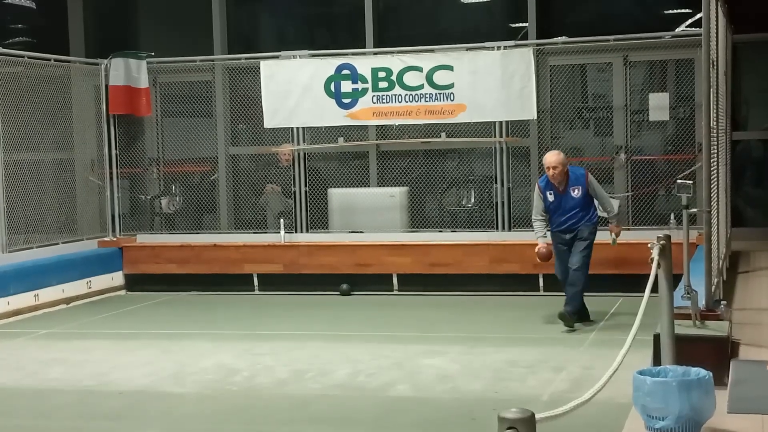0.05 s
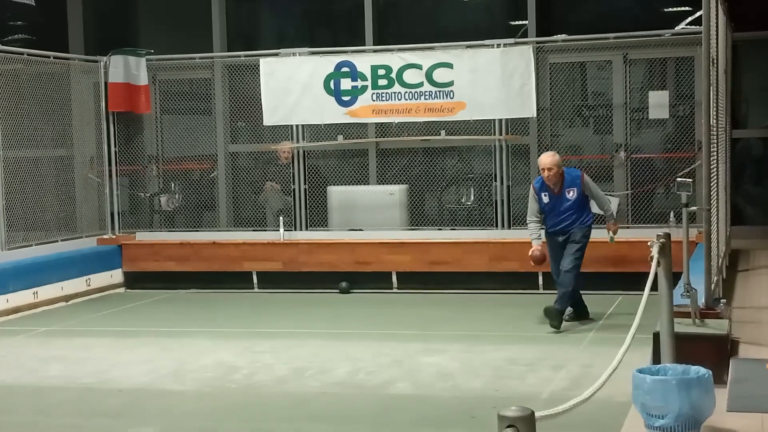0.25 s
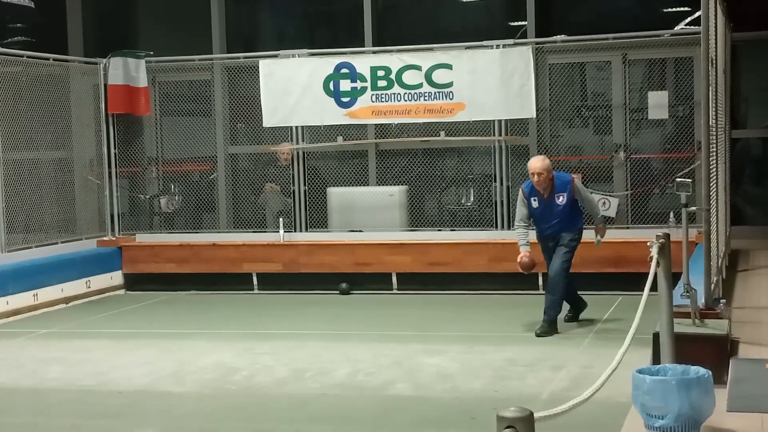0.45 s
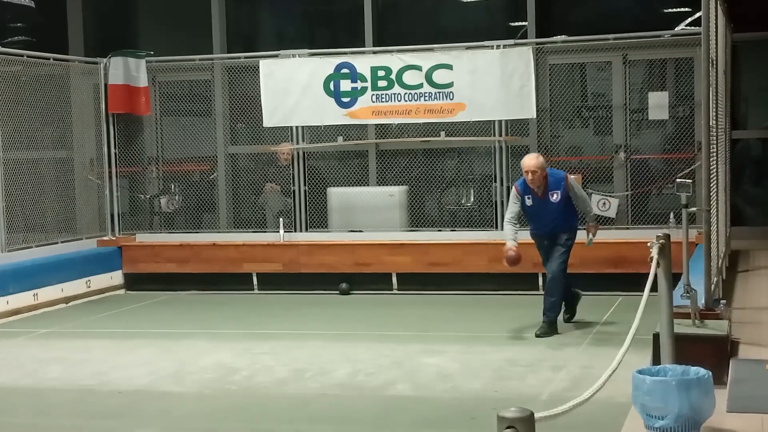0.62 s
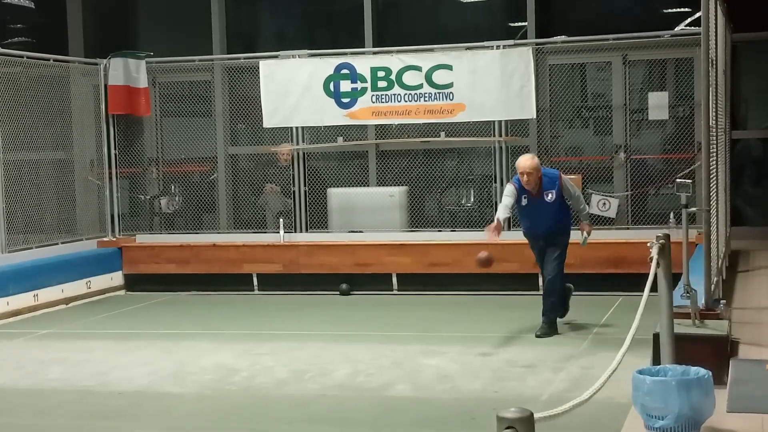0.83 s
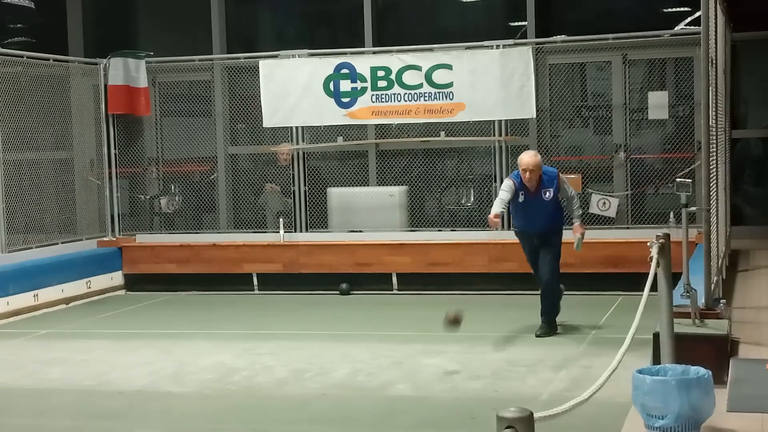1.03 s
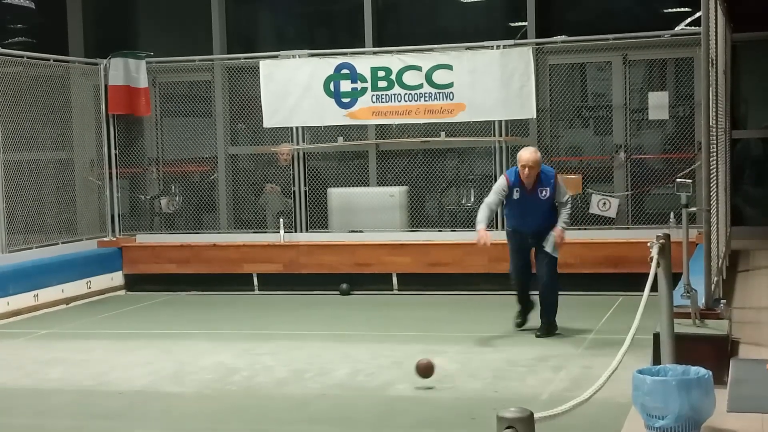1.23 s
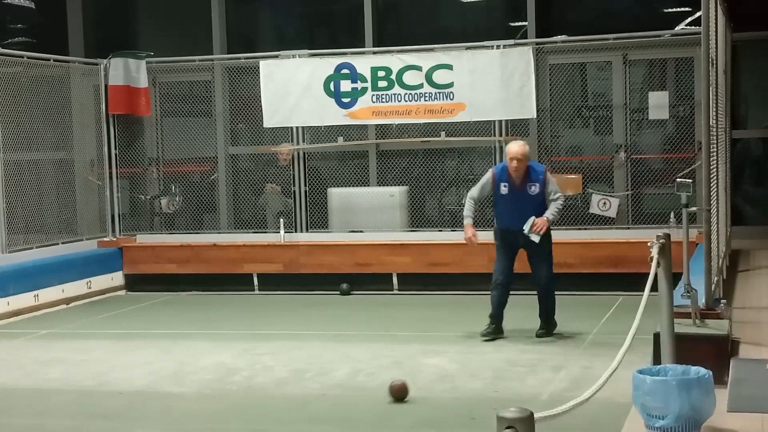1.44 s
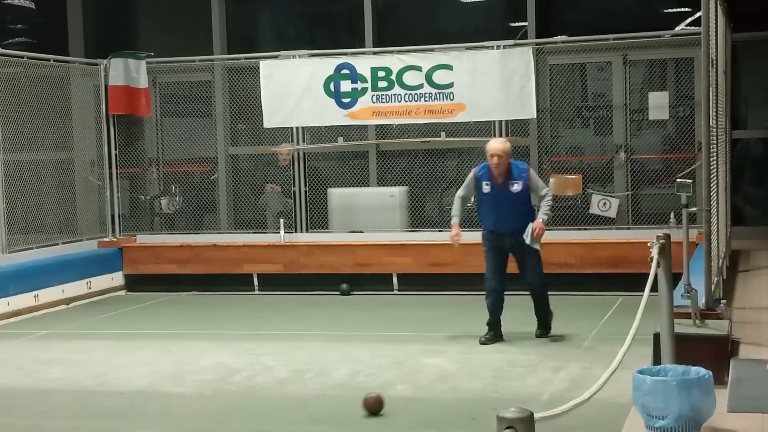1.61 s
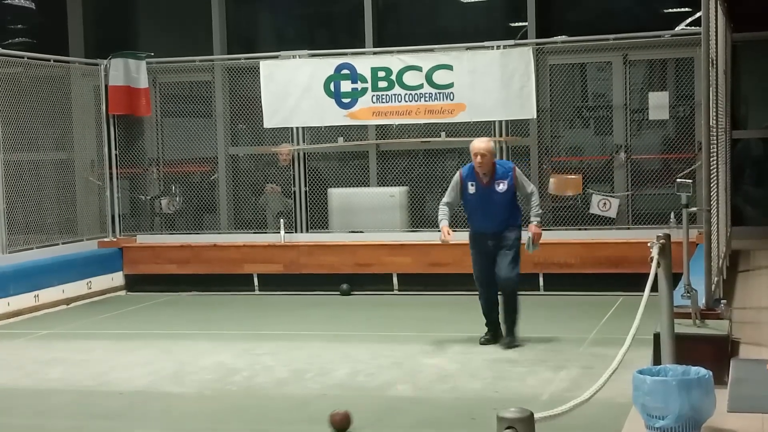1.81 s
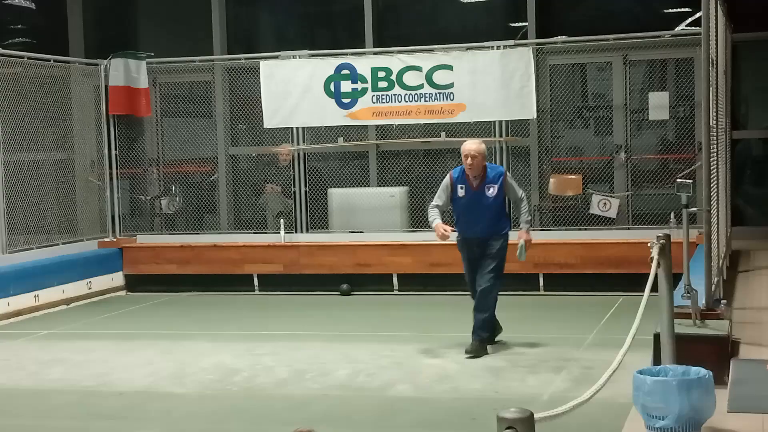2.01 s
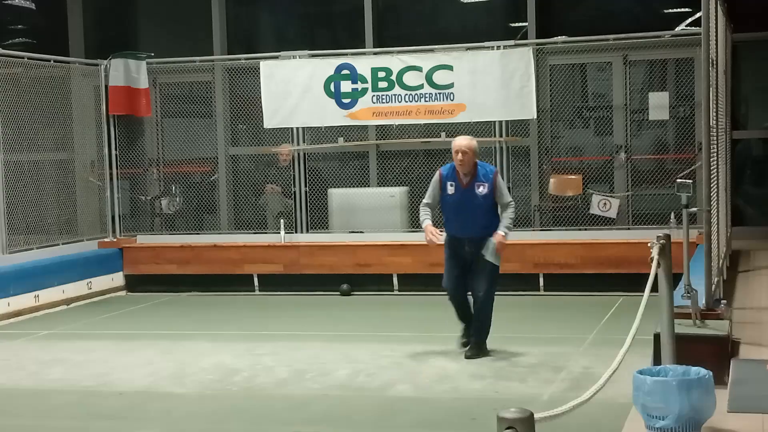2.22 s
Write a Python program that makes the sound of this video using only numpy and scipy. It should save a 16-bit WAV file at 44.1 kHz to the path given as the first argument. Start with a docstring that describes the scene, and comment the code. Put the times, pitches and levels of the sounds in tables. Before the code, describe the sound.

A heavy bocce ball thuds onto an indoor court, echoing darkly, then skips lightly away

```python
"""Indoor court, from the floor: an earlier sound dies away with a hollow ring, amid scuffs and soft steps.
A heavy bocce ball lands: a low coloured pulse for the thud, a tiny treble burst for the hard tick on top.
Walls and roof throw back distinct echoes, then noise decaying band by band makes a long dark reverberation.
The ball skips on lightly as delayed, quieter copies of the thud with drawn-out ticks, and soles squeak.
Towards the end a faint rumble swells as the ball rolls past, among more scuffs and a last step."""
import sys
import numpy as np
from scipy import signal
from scipy.fft import rfft, irfft
from scipy.io import wavfile
from scipy.ndimage import uniform_filter1d

SR = 44100
rng = np.random.default_rng(int(sys.argv[2]) if len(sys.argv) > 2 else 0)


def master(y):
    """Save y as 16-bit WAV."""
    cut = np.clip(np.atleast_2d(y).T, -1, 1)
    pcm = np.round(cut * 32767)  # scale
    wavfile.write(sys.argv[1], SR, pcm.astype(np.int16))


N = 99621

# steady air of the hall: pitch_hz, level_db (per Hz)
AIR_COLOUR = [(15, -45), (25, -34), (53, -6), (172, -9), (207, -7.5), (394, -13), (811, -15), (903, -15),
              (1350, -16.5), (1460, -16.5), (6540, -22.5), (7280, -23.5), (15000, -31)]
AIR_DB = -69
# earlier sound still dying away in the hall: pitch_hz, level_db (per Hz)
OLD_RING_COLOUR = [(25, -30), (60, -22), (100, 0.5), (150, -4.5), (250, 2), (470, -5.5), (580, 0.5),
                   (900, -6.5), (1400, -14.5), (3000, -16.5), (8000, -18)]
OLD_RING_DB = -48
# hollow ring fading at the start
OLD_NOTE_HZ, OLD_NOTE_WIDTH_HZ, OLD_NOTE_DB, OLD_NOTE_DECAY_S = 578, 52, -55, .16

# decay of the hall by 60 dB: pitch_hz, time_s
HALL_T60 = [(80, 2.37), (200, 1.75), (600, 1.81), (1200, 1.915), (2500, 2.25), (5000, 1.58), (9500, 0.91),
            (14000, 0.57)]
FIRST_ECHO_S, BUILD_S = 0.00047, .024
TICK_BUILD_S = 0.01  # the treble scatters back from the nearby netting sooner
LUMP_DB, LUMP_S = 1.5, 0.031  # late echoes arrive in uneven clusters
# resonances that stand out of the reverberation: pitch_hz, level_db
HALL_MODES = [(66, -62), (183, -34), (325, -35), (418, -39), (480, -34.5), (547, -33), (679, -38.5),
              (742, -42), (845, -40), (1030, -41.5), (1115, -44)]

# soft footfalls booming in the floor: peak_s, level_db
STEPS = [(.005, -61), (.115, -56.5), (2.22, -60)]
STEP_HZ, STEP_WIDTH_HZ, STEP_S = 97, 12, 0.04
# shoe scuffs: peak_s, rise_s, fall_s, level_db, hiss_db (thin top hiss), tilt_db (highest treble)
SCUFFS = [(.03, 0.046, 0.1, -59, -59.5, -3), (.115, 0.053, 0.047, -58, -50, 8),
          (0.176, 0.036, 0.16, -54.5, -57.5, 2.5), (.385, 0.053, 0.16, -58, -62.5, 3.5),
          (.56, 0.075, 0.1, -67, -64, -5), (2.125, 0.033, 0.092, -55.5, -65.5, -9),
          (2.22, .05, .15, -58.5, -71, -10)]
# colour of a scuff: pitch_hz, level_db (per Hz)
SCUFF_COLOUR = [(100, 2), (600, 0), (1500, 0), (2600, -2), (4000, 1.5), (6000, -1.5), (8000, -4),
                (10500, -3.5), (12000, -7.5), (15500, -7.5)]
TILT_START_HZ, TILT_END_HZ = 7800, 14000  # range over which a scuff's colour tilts
HISS_HZ, HISS_WIDTH_HZ = 9550, 820
# squeaks of soles: start_s, pitch_hz, level_db (at the start), decay_s
SQUEAKS = [(1.712, 1660, -49.5, 0.0079), (2.1, 2320, -51.5, 0.0053), (2.13, 2850, -49.5, .005)]
SQUEAK_WIDTH_HZ = 220

# colour of the rolling ball: pitch_hz, level_db (per Hz)
ROLL_COLOUR = [(50, -19), (100, 7), (300, -4.5), (1000, -1.5), (1500, -7), (2000, -8), (2800, -13.5),
               (6000, -22.5), (9500, -21), (14000, -36)]
ROLL_PEAK_S, ROLL_SWELL_S, ROLL_DB = 2.04, 0.24, -56

LAND_S, THUD_DB, TICK_DB = 1.2729, -11.5, -21  # levels are peaks of the direct push and tick
TICK_LEAD_S, TICK_DECAY_S = .0008, .0004  # the surfaces click before the push peaks
SKIP_CRUNCH_S = 0.0031  # a skip grazes the court, so its tick is drawn out
# push of the ball on the court: pitch_hz, level_db
THUD_COLOUR = [(30, -45), (70, -27), (110, -7.5), (190, 6.5), (330, 1.5), (600, -14), (1000, -9),
               (1250, -24), (1500, -36), (1850, -30), (2600, -71), (5000, -69)]
# click of the hard surfaces: pitch_hz, level_db
TICK_COLOUR = [(1000, -30), (2700, -21), (3900, 0), (6000, -5), (8000, 1), (10000, 2), (12500, -6.5),
               (14000, -14), (15500, -25)]
# distinct echoes from walls and roof: peak_s, level_db (peak)
ECHOES = [(1.2852, -11), (1.2899, -13.5), (1.2930, -16), (1.3108, -15), (1.315, -21.5), (1.3302, -19),
          (1.3324, -18.5), (1.3428, -11.5), (1.3517, -16)]
# colour of an echo: pitch_hz, level_db
ECHO_COLOUR = [(30, -41), (80, -9), (160, 5.5), (330, 1.5), (550, 8), (800, -16.5), (1150, -19),
               (1500, -64), (1850, -29), (2600, -81), (5000, -75)]
ECHO_TICK_DB = -25  # extra loss of the tick in an echo, beyond that of the thud
# light skips, levels relative to the landing: peak_s, thud_db, tick_db, tick_ring_db
SKIPS = [(1.4822, -12, -22, -24), (1.7150, -20.5, -37, -36), (2.0150, -26, -29, -20)]
# reverberation of the thud: pitch_hz, level_db (per Hz)
THUD_RING_COLOUR = [(25, -47), (45, -44), (70, -25), (105, -19), (135, -5.5), (180, 1), (300, -0.5),
                    (500, -1.5), (750, -0.5), (1100, -10), (1300, -17.5), (1500, -35), (1800, -31),
                    (2300, -46.5), (4000, -56)]
# reverberation of the tick: pitch_hz, level_db (per Hz)
TICK_RING_COLOUR = [(1200, -25), (2600, -7), (3800, 0.5), (5500, 1.5), (7500, -3), (9800, 5.5), (12000, -7),
                    (15500, -19)]
THUD_RING_DB, TICK_RING_DB = -21.5, -43
# the court rebounds after the push; level relative to the push
COURT_HZ, COURT_DB, COURT_DECAY_S = 223, -7, .005
# a short ring follows each echo pulse, at its own pitch; level relative to that echo's push
ECHO_RING_HZ, ECHO_RING_DB, ECHO_RING_DECAY_S = 398, -8, 0.0056
# bass roll-off of a ringing surface: pitch_hz, level_db
MIC_BASS = [(20, -29), (45, -16), (80, -3.5), (130, -1.5)]
TOP_HZ = 15550  # upper limit of the recorder


def undb(db):
    """Decibels to gain."""
    return 10 ** (np.asarray(db) / 20)


def lookup(points, hz):
    """Read (Hz, value) points on a log-frequency axis."""
    f, value = np.array(points, float).T
    return np.interp(np.log(np.maximum(hz, 1)), np.log(f), value)


def colour(x, points):
    """Filter by (Hz, dB) points without shifting phase."""
    f = np.fft.rfftfreq(2 * N, 1 / SR)
    return irfft(rfft(x, 2 * N) * undb(lookup(points, f)))[:N]


def noise(points):
    """Coloured noise of rms 1."""
    x = colour(rng.standard_normal(N), points)
    return x / x.std()


def resonance(hz, width_hz):
    """Noise of rms 1 in one resonance, at half amplitude width_hz to either side."""
    f = np.fft.rfftfreq(N, 1 / SR)
    x = irfft(rfft(rng.standard_normal(N)) / (1 + ((f - hz) / width_hz) ** 2), N)
    return x / x.std()


def since(at):
    """Seconds since a moment, zero before it."""
    return np.maximum(np.arange(N) / SR - at, 0)


def lumps():
    """Gain that wanders a little from one cluster of echoes to the next."""
    size = int(LUMP_S * SR)
    x = uniform_filter1d(uniform_filter1d(rng.standard_normal(N), size), size)
    return undb(LUMP_DB * x / x.std())


def hall(at, points, build_s=BUILD_S):
    """Diffuse reverberation: it builds up, then each band dies at its own rate."""
    age = since(at + FIRST_ECHO_S)
    spectrum, f = rfft(noise(points)), np.fft.rfftfreq(N, 1 / SR)
    octave = np.log2(np.clip(f, 62.5, 16000) / 62.5)
    out = 0
    for k in range(9):  # overlapping octave bands from 62.5 Hz to 16 kHz
        t60 = lookup(HALL_T60, 62.5 * 2 ** k)
        band = irfft(spectrum * np.maximum(1 - abs(octave - k), 0), N)
        out = out + band * np.exp(-np.log(1000) * age / t60)
    return out * (1 - np.exp(-age / build_s)) * lumps()


def background():
    """Fading reverberation with a hollow ring, over the quiet air of the hall."""
    note_fade = np.exp(-since(0) / OLD_NOTE_DECAY_S)
    note = undb(OLD_NOTE_DB) * note_fade * resonance(OLD_NOTE_HZ, OLD_NOTE_WIDTH_HZ)
    old_ring = undb(OLD_RING_DB) * hall(-.05, OLD_RING_COLOUR)  # begun 50 ms before the start
    air = undb(AIR_DB) * noise(AIR_COLOUR)
    return note + old_ring + air


def footfalls():
    """Each soft step makes the floor boom briefly: narrow low noise under a smooth bump."""
    t = np.arange(N) / SR
    bumps = sum(undb(db) * np.exp(-((t - at) / STEP_S) ** 2) for at, db in STEPS)
    return bumps * resonance(STEP_HZ, STEP_WIDTH_HZ)


def shoes():
    """Soles slide with a swelling hiss and now and then catch in a short squeak."""
    t, out = np.arange(N) / SR, 0
    for at, rise, fall, db, hiss_db, tilt_db in SCUFFS:
        slide = colour(noise(SCUFF_COLOUR), [(TILT_START_HZ, 0), (TILT_END_HZ, tilt_db)])
        hiss = resonance(HISS_HZ, HISS_WIDTH_HZ)
        swell = np.exp(-(np.minimum(t - at, 0) / rise) ** 2 - since(at) / fall)
        out = out + swell * (undb(db) * slide + undb(hiss_db) * hiss)
    for at, hz, db, decay in SQUEAKS:
        fade = (t > at) * np.exp(-since(at) / decay)
        out = out + undb(db) * fade * resonance(hz, SQUEAK_WIDTH_HZ)
    return out


def hall_modes():
    """The landing sets a few resonances of the hall ringing as decaying sines."""
    age, rings = since(LAND_S + FIRST_ECHO_S), 0
    for hz, db in HALL_MODES:
        tone = np.sin(2 * np.pi * (hz * age + rng.random()))
        rings = rings + undb(db) * tone * np.exp(-np.log(1000) * age / lookup(HALL_T60, hz))
    return rings * (1 - np.exp(-age / BUILD_S))


def roll():
    """A faint rumble of coloured noise swells and sinks as the ball runs past."""
    t = np.arange(N) / SR
    swell = np.exp(-((t - ROLL_PEAK_S) / ROLL_SWELL_S) ** 2)
    return undb(ROLL_DB) * swell * noise(ROLL_COLOUR)


def pulse(at, points):
    """One coloured pressure pulse of peak 1."""
    impulse = np.maximum(1 - abs(np.arange(N) - at * SR), 0)  # placed between samples
    x = colour(impulse, points)
    return x / abs(x).max()


def rebound(at, hz, db, decay_s):
    """A struck surface springs back and rings for a cycle or two."""
    age = since(at)
    ringing = np.sin(2 * np.pi * hz * age) * np.exp(-age / decay_s)
    return -undb(db) * colour(ringing, MIC_BASS)


def tick(at, decay_s=TICK_DECAY_S):
    """The brief crunch of first contact, evened out before it is coloured, peak 1."""
    age = since(at - TICK_LEAD_S)
    burst = rfft(rng.standard_normal(N) * (age > 0) * np.exp(-age / decay_s))
    even = irfft(np.exp(1j * np.angle(burst)), N)  # keep the phases, level the spectrum
    x = colour(even * (age > 0), TICK_COLOUR)
    return x / abs(x).max()


def thud_ring(at):
    """Dark reverberation that the thud leaves in the hall."""
    return undb(THUD_RING_DB) * hall(at, THUD_RING_COLOUR)


def tick_ring(at):
    """Treble reverberation that the tick leaves in the hall, quicker to build up."""
    return undb(TICK_RING_DB) * hall(at, TICK_RING_COLOUR, TICK_BUILD_S)


def ball():
    """Landing and skips: each is a thud with its echoes, a tick and their reverberation."""
    court = rebound(LAND_S, COURT_HZ, COURT_DB, COURT_DECAY_S)
    thud = undb(THUD_DB) * (pulse(LAND_S, THUD_COLOUR) + court)
    click = undb(TICK_DB) * tick(LAND_S)
    for at, db in ECHOES:
        echo_ring = rebound(at, ECHO_RING_HZ, ECHO_RING_DB, ECHO_RING_DECAY_S)
        thud = thud + undb(db) * (pulse(at, ECHO_COLOUR) + echo_ring)
        click = click + undb(TICK_DB + ECHO_TICK_DB + db - THUD_DB) * tick(at)
    out = thud + click + thud_ring(LAND_S) + tick_ring(LAND_S)
    for at, thud_db, tick_db, ring_db in SKIPS:
        late_thud = np.pad(thud, (int((at - LAND_S) * SR), 0))[:N]  # its echoes come along
        out = out + undb(thud_db) * (late_thud + thud_ring(at))
        out = out + undb(TICK_DB + tick_db) * tick(at, SKIP_CRUNCH_S)
        out = out + undb(ring_db) * tick_ring(at)
    return out


def scene():
    """Hall, shoes and ball in one channel."""
    surroundings = background() + footfalls() + shoes()
    return (surroundings + hall_modes() + roll() + ball())[None]


def record(dry):
    """The recorder cuts the top with a steep low-pass."""
    return signal.sosfilt(signal.ellip(10, .1, 70, TOP_HZ, fs=SR, output="sos"), dry)


dry = scene()
out = record(dry)
master(out)
```